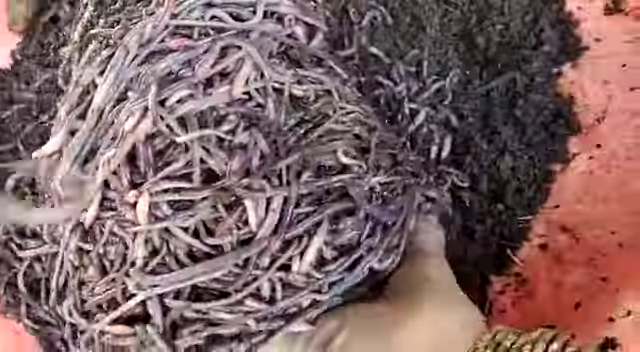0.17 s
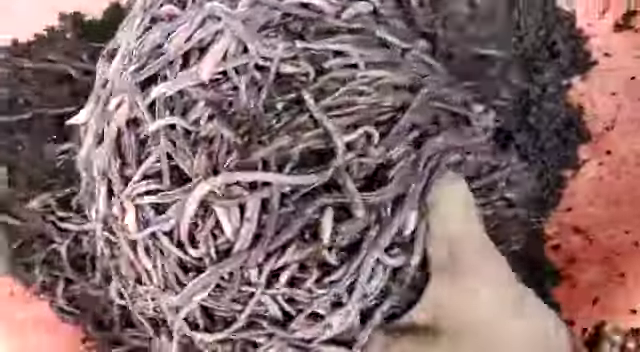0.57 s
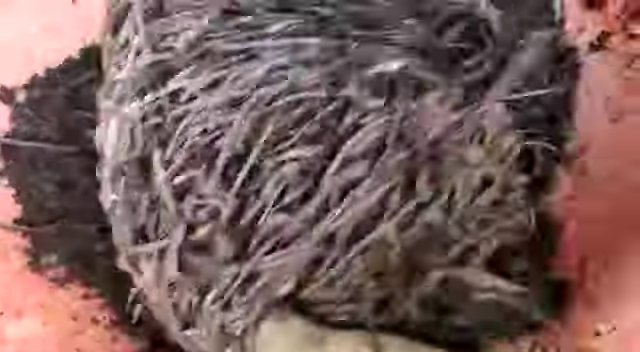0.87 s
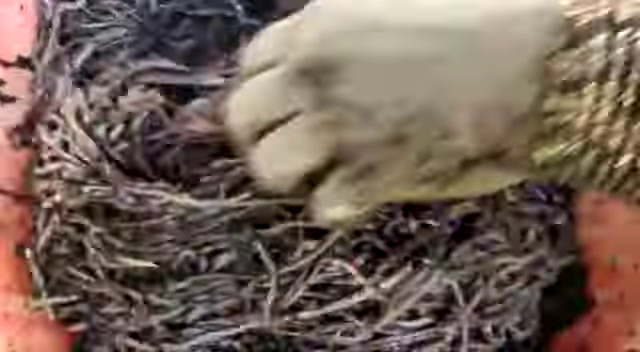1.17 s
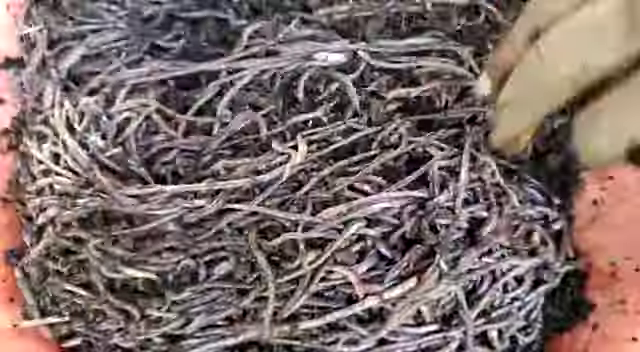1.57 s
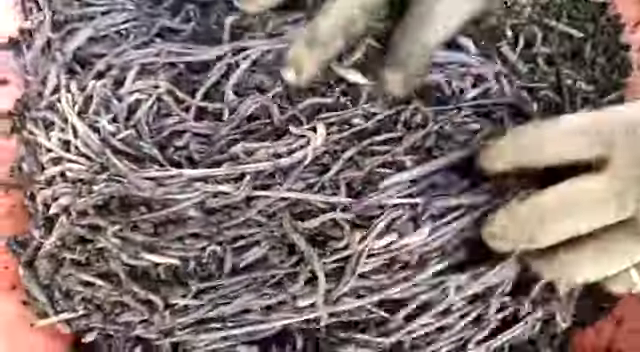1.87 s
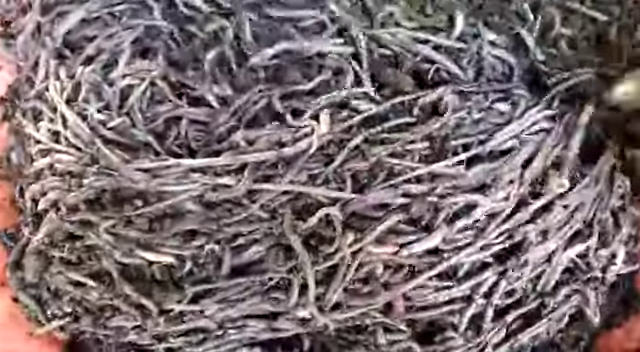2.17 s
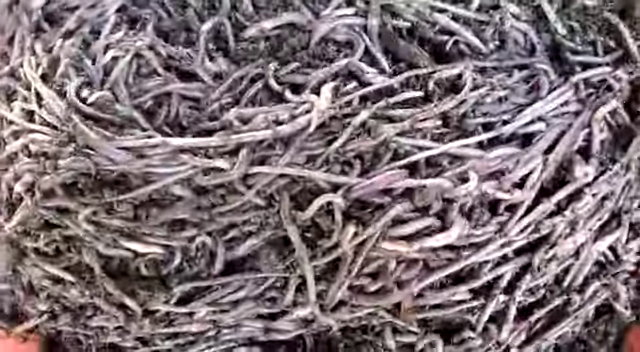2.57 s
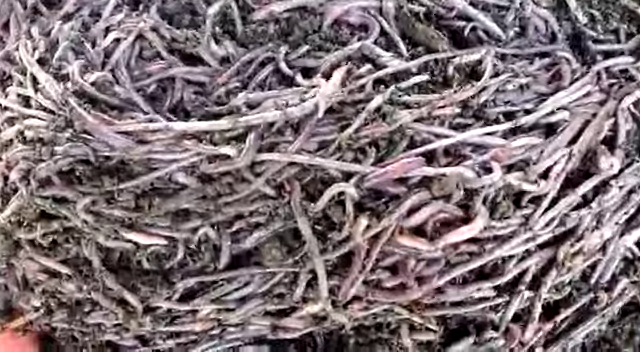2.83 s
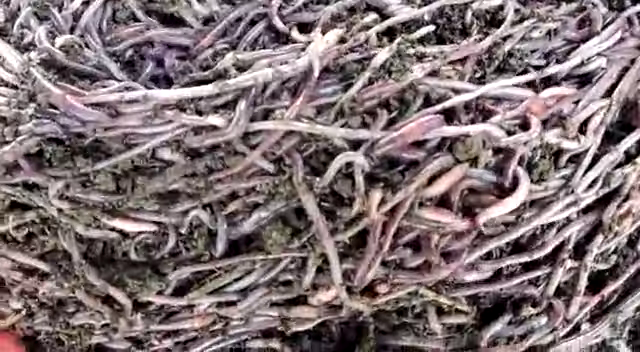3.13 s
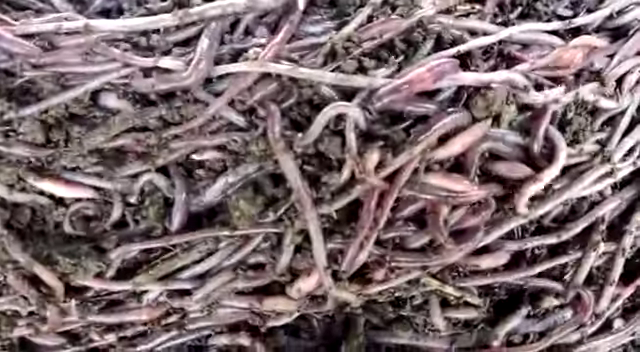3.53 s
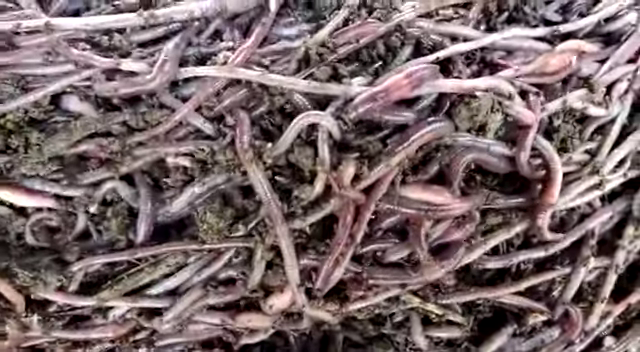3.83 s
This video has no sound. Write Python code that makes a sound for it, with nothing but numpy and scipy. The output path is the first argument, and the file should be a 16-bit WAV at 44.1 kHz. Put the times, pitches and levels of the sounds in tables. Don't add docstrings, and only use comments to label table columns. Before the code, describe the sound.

Close to the microphone, damp soil rumbles and knocks across a plastic basin for under a second, then stops; bangles clink, fingers briefly push the heap, and faint birds and crickets continue outdoors.

```python
import sys
import numpy as np
from scipy import signal
from scipy.fft import rfft, irfft, next_fast_len
from scipy.io import wavfile
from scipy.ndimage import uniform_filter1d, map_coordinates

SR = 44100
rng = np.random.default_rng(int(sys.argv[2]) if len(sys.argv) > 2 else 0)


def persist_wave(psi):
    counts = np.round(np.clip(psi, -1, 1) * 32767).astype(np.int16)
    wavfile.write(sys.argv[1], SR, np.atleast_2d(counts).T)


def rack_gain(trim_db):
    fader = np.asarray(trim_db, float)
    return 10 ** (fader / 20)


N = 176400

# t/s, level/dB
DRAG = [(0, -51.5), (.045, -46.5), (.115, -44), (.128, -45), (.2, -43), (.3, -49), (.43, -51), (.6, -46.5),
        (.66, -47.5), (.74, -47.5), (.815, -45.5), (.84, -58), (.86, -51), (.89, -47)]
# t/s, level/dB
PUSH = [
    (2.23, -52.5),
    (2.3, -76),
    (2.35, -68),
    (2.45, -75.5),
    (2.57, -78.5),
    (2.7, -75),
    (2.8, -64),
    (2.9, -66.5),
    (2.98, -79),
    (3.06, -85),
]
# f/Hz, level/dB
BASIN = [(40, -52), (246, -15.5), (631, -9.5), (1730, -19.5), (4000, -47.5)]
# f/Hz, level/dB
GRIT = [(700, -32.5), (1500, -8), (3170, -5), (4890, -10), (7400, -3.5), (15800, -21)]
# f/Hz, level/dB
CRUMBS = [(600, -36), (1500, 0), (6000, -21), (12000, -16), (15800, -20)]
# f/Hz, likeness [0..1]
BASIN_ALIKE = [(60, 0.84), (300, 1), (640, 0.92), (1400, 0)]
# t/s, peak level/dB, pitch f/Hz, T60/s
LUMPS = [(.039, -31.5, 540, 0.033), (.058, -29.5, 398, 0.033), (.078, -32.5, 644, 0.057),
         (.1, -34, 611, 0.061), (.144, -32.5, 700, 0.043), (0.156, -31, 515, 0.05), (.18, -26, 738, 0.035),
         (.212, -41, 772, 0.076), (0.366, -26.5, 483, 0.015), (.398, -37, 320, .03),
         (.445, -41, 484, 0.028), (.48, -33.5, 480, 0.023), (0.536, -34.5, 492, 0.036),
         (0.6, -34, 435, 0.033), (.727, -34, 393, 0.017), (.75, -25.5, 713, 0.021), (.802, -32, 616, .05),
         (0.813, -29.5, 606, 0.038), (0.854, -36.5, 657, 0.022), (0.878, -17, 665, 0.015),
         (.894, -16, 699, 0.011), (1.374, -62, 190, .08), (2.221, -28, 225, 0.02), (2.224, -35, 728, 0.019),
         (2.349, -47.5, 248, 0.037), (2.563, -57, 277, 0.074), (2.723, -69, 380, 0.072),
         (2.795, -49, 410, 0.025), (2.816, -40.5, 415, 0.021)]
# t/s, peak level/dB, low f/Hz, high f/Hz
TICKS = [
    (.1067, -37, 3970, 16330),
    (.2149, -36, 3000, 16340),
    (0.442, -33.5, 6460, 16700),
    (0.6958, -29.5, 1000, 15200),
    (1.53, -41.5, 1500, 16000),
    (2.059, -40.5, 890, 3175),
    (2.236, -25, 5460, 16000),
    (2.811, -38, 890, 4930),
    (2.967, -48, 7060, 15570),
]
# t/s, peak level/dB, low modes level/dB
CLINKS = [(0.039, -50, -17), (1.668, -37, -8), (3.016, -62.5, -19), (3.975, -66.5, -14.5),
          (0.8138, -45.5, -4), (0.8998, -34.5, 4.5), (0.9342, -43, -1), (1.115, -41.5, -9.5),
          (1.1353, -42.5, -7.5), (1.452, -40.5, -4), (1.4667, -46, -5.5), (1.658, -40, -9),
          (1.6869, -33.5, -7.5), (2.146, -49, -1.5), (2.1924, -37.5, -5), (2.215, -41, -3),
          (2.2471, -30.5, -6.5), (2.3106, -58, 7), (2.565, -57, -3), (2.7767, -55.5, -13),
          (3.491, -57, -29), (3.651, -38, -11.5), (3.688, -49.5, -13)]
# f/Hz, level/dB
GLASS = [(5900, 0), (6370, 0), (6850, -5), (7250, -8.5), (7800, -7), (10910, -1), (11060, -2),
         (11200, -1.5), (11470, -6.5), (11620, -4.5), (11800, -2), (12040, -2.5), (12550, -4.5),
         (13200, -10.5), (14150, -14)]
# t after the falling note/s, length/s, from f/Hz, to f/Hz, level/dB
SONG = [
    (-.04, 0.024, 3988, 3875, -8.5),
    (-.008, 0.016, 4340, 3560, -2),
    (0.01, 0.03, 3770, 3580, -4),
    (0.05, 0.048, 5256, 5383, -9),
    (0.098, .007, 6600, 5000, -14),
    (0.109, 0.028, 4737, 4576, -4),
]
# t/s, first half level/dB, second half level/dB, second half left-right level/dB
PHRASES = [
    (1.439, -54.5, -60, -25),
    (1.793, -55.5, -57.5, -11),
    (2.126, -58, -49, 10),
    (2.481, -53, -52, 12.5),
    (2.811, -58, -61.5, 11),
    (3.158, -58.5, -54, 14),
]
# t/s, length/s, from f/Hz, to f/Hz, level/dB
WHISTLES = [
    (1.477, 0.045, 5630, 5520, -64),
    (1.6, 0.057, 6700, 5070, -74),
]
# t/s, length/s, low f/Hz, high f/Hz, level/dB
RASPS = [(0.516, 0.18, 5750, 7490, -57), (0.972, 0.076, 5380, 5970, -63.5), (1.217, 0.17, 805, 1350, -72.5),
         (1.2, 0.49, 1295, 2279, -69.5), (1.257, 0.14, 2400, 5410, -60), (1.738, 0.22, 2448, 2620, -83),
         (1.858, 0.059, 5076, 5714, -62.5), (1.977, 0.18, 6330, 7270, -58),
         (1.996, 0.48, 1034, 2240, -67.5), (2.278, 0.14, 6140, 7290, -54), (2.339, 0.13, 7200, 8450, -58),
         (2.272, .13, 2500, 4100, -68), (2.495, 0.45, 2340, 2810, -74.5), (2.581, 0.094, 5050, 6100, -64),
         (3.096, 0.15, 2780, 5720, -59.5), (3.152, 0.17, 2440, 2690, -68), (3.289, 0.089, 5100, 5730, -69),
         (3.321, 0.15, 5970, 6500, -75.5), (3.55, 0.6, 1870, 2060, -75), (3.569, 0.3, 5930, 6070, -69),
         (3.786, 0.15, 2690, 5600, -59), (3.846, .2, 2460, 2795, -66.5)]
# from t/s, to t/s, level/dB
CRICKET = [
    (.08, .72, -63),
    (.9, 1.05, -63.5),
    (1.18, 1.7, -61),
    (1.88, 2.0, -71),
    (2.03, 2.4, -58.5),
    (2.42, 2.82, -72.5),
    (2.85, 3.24, -60.5),
    (3.26, 3.56, -74.5),
    (3.65, 4.05, -62),
]
# from t/s, to t/s, level/dB
KATYDID = [
    (1.25, 1.45, -80),
    (1.5, 2.02, -76),
    (2.35, 2.65, -79),
    (2.96, 3.62, -79.5),
]
# from t/s, to t/s, level/dB
FAR_KATYDID = [
    (.95, 1.4, -77),
    (2.05, 2.78, -75),
    (3.35, 4.05, -84.5),
]
# f/Hz, level/dB
AIR = [(30, -13.5), (170, -1), (450, -12.5), (1200, -14), (2400, -1.5), (3100, -10), (5500, -6.5),
       (9300, -8.5), (10200, -16), (15500, -27.5)]
# f/Hz, left-right level/dB
AIR_PAN = [(200, 3), (3000, 12)]

GRIT_DB, GRIT_STOPS_S, CRUMBS_DB, LUMP_CUT_HZ = -55, 0.78, -41, 130
GLASS_T60_S, HAND_LEAVES_S, HAND_PAN_DB = .045, 2.3, 9.5
RASP_RATE_HZ, RASP_PAN_DB, RASP_RISE_S, RASP_STREAK_DB = 130, 16.5, 0.018, 4
CRICKET_BLUR, AIR_DB = 1.1, -77
YARD_T60_S, GLASS_YARD_DB, CALLS_YARD_DB = 0.45, -18, -9.5
GATE_SHARE_PERCENT, GATE_DEPTH_DB, TOP_HZ = 18, 22, 15750


def unit(x):
    return x / np.sqrt(np.mean(x ** 2) + 1e-20)


def along(points, hz):
    f, v = np.transpose(points)
    return np.interp(np.log(hz + 1), np.log(f + 1), v)


def gain(rows, fade):
    s, db = np.transpose(rows)
    t = np.arange(N) / SR
    gate = np.clip(np.minimum(t - s[0], s[-1] - t) / fade + 1, 0, 1)
    return gate * rack_gain(np.interp(t, s, db))


def bouts(rows, fade=0.078):
    t = np.arange(N) / SR
    return sum(rack_gain(db) * np.clip(np.minimum(t - a, b - t) / fade + .5, 0, 1) for a, b, db in rows)


def wobble(rate):
    knots = rng.standard_normal(int(N * rate / SR) + 4)
    return map_coordinates(knots, [np.arange(N) * rate / SR])


def filtered(x, response):
    m = next_fast_len(x.shape[-1] + 8192)
    return irfft(rfft(x, m) * response(np.fft.rfftfreq(m, 1 / SR)), m)[..., :x.shape[-1]]


def band(x, low_hz, high_hz, low_order, high_order):
    return filtered(x, lambda f: 1 / (1 + (low_hz / (f + 1)) ** low_order + (f / high_hz) ** high_order))


def sides(db):
    return np.sqrt(2 / (1 + rack_gain(np.array([-2 * db, 2 * db]))))


def add(out, s, x, pan_db):
    part = out[:, round(s * SR):][:, :x.shape[-1]]
    part += (sides(pan_db)[:, None] * x)[:, :part.shape[1]]


def rush(source, spectrum, alike):
    def mid_side(hz):
        turn = np.arccos(np.clip(along(alike, hz), -1, 1)) / 2
        return rack_gain(along(spectrum, hz)) * [np.cos(turn), np.sin(turn)]
    mid, side = filtered(source, mid_side)
    return unit(np.array([mid + side, mid - side]))


def gravel(rate, spread_db, smooth):
    hit = rng.random(N) < rate / SR
    size = hit * rack_gain(spread_db * np.minimum(rng.exponential(size=N), 3))
    return unit(size * rng.standard_normal((2, N))) + smooth * rng.standard_normal((2, N))


def patches(x, depth_db, bins, frames):
    z = signal.stft(x, nperseg=512)[2]
    field = rng.standard_normal(z.shape)
    for _ in range(2):
        field = uniform_filter1d(field, int(bins), 1)
        field = uniform_filter1d(field, int(frames), 2)
    return signal.istft(z * rack_gain(depth_db * unit(field)), nperseg=512)[1][:, :x.shape[-1]]


def dragged_soil():
    grains = rush(gravel(500, spread_db=2, smooth=1.16), BASIN, BASIN_ALIKE)
    rumble = patches(grains, depth_db=2.5, bins=2, frames=3.3)
    out = gain(DRAG, fade=0.02) * rack_gain(0.83 * wobble(70)) * rumble
    grit = rush(gravel(820, spread_db=8.5, smooth=4.2), GRIT, [(3000, 0.071)])
    hiss = patches(grit, depth_db=3.0, bins=8.8, frames=4.8)
    after_s = np.maximum(np.arange(N) / SR - GRIT_STOPS_S, 0)
    hiss_gain = rack_gain(GRIT_DB - 83 * after_s ** 1.36)
    return out + hiss_gain * rack_gain(0.56 * wobble(22.0)) * sides(2.5)[:, None] * hiss


def pushed_heap():
    push = gain(PUSH, fade=0.018)
    dull = BASIN * np.array([.48, 1.15])
    grains = rush(gravel(200, spread_db=-3.0, smooth=1.86), dull, BASIN_ALIKE)
    rub = push * rack_gain(3.86 * wobble(28.39)) * patches(grains, depth_db=7.0, bins=1.8, frames=3.6)
    falling = rush(gravel(260, spread_db=4, smooth=1.2), CRUMBS, [(3000, .4)])
    crumbs = patches(falling, depth_db=6, bins=12, frames=3.5)
    return rub + push ** 0.54 * rack_gain(CRUMBS_DB) * sides(6.9)[:, None] * crumbs


def lumps_and_ticks():
    out, t = np.zeros((2, N)), np.arange(SR // 10) / SR
    for s, db, hz, t60 in LUMPS:
        r = rng.normal(size=4)
        modes = [(1, 1), (.55 + 0.032 * r[0], .25), (1.4 + .1 * r[1], .4)]
        ring = sum(g * np.sin(2 * np.pi * hz * k * t) for k, g in modes)
        soft_start = (1 - np.exp(-t * hz / .4)) ** 2
        knock = rack_gain(db + 4 - 60 * t / t60) * soft_start * ring
        add(out, s, filtered(knock, lambda f: (1j * f / (LUMP_CUT_HZ + 1j * f)) ** 2), -1.5)
    for s, db, low_hz, high_hz in TICKS:
        tick = rack_gain(-60 * t / 0.0112) * rng.standard_normal((2, len(t)))
        add(out, s, rack_gain(db) * band(tick, low_hz, high_hz, 4, 6), 3)
    return out


def bangles():
    out, t = np.zeros((2, N)), np.arange(SR // 6) / SR
    hz, level = np.transpose(GLASS)[:, :, None]
    low = hz < 9500
    for s, db, low_db in CLINKS:
        pan_db = HAND_PAN_DB * (s > HAND_LEAVES_S)
        for touch in range(3):
            r = rng.normal(size=(4, len(GLASS), 1))
            t60 = GLASS_T60_S * rack_gain(r[1])
            env = rack_gain(level + low_db * low + 2.5 * r[0] - 60 * t / t60)
            mode_hz = hz * (1 + (0.0056 + 0.023 * low) * r[2])
            phase = 2 * np.pi * mode_hz * t
            ring = np.array([np.sum(env * np.sin(phase + mic * 2 * r[3]), 0) for mic in (0, 1)])
            crack = 0.36 * rack_gain(-60 * t / 0.0094) * np.diff(rng.standard_normal((2, len(t) + 1)))
            clink = ring * (1 - np.exp(-t / 0.00073)) + crack
            touch_db = db - 7.5 - 1.8 * abs(touch - .8)
            add(out, s + 0.0035 * touch, rack_gain(touch_db) * clink, pan_db)
    return out


def note(length, from_hz, to_hz, db):
    full_s = length * 1.3
    u = np.arange(int(full_s * SR)) / (full_s * SR)
    env = rack_gain(db + 3.5 + 4.6 * wobble(220)[:len(u)]) * np.sin(np.pi * u) ** 0.89
    return env * np.sin(2 * np.pi * np.cumsum(from_hz + (to_hz - from_hz) * u) / SR)


def whistling_birds():
    out = np.zeros((2, N))
    for s, first_db, second_db, second_pan_db in PHRASES:
        for after, length, from_hz, to_hz, db in SONG:
            tune, late = 1 + 0.019 * rng.normal(), after > .05
            half_db, pan_db = (second_db, second_pan_db) if late else (first_db, 14)
            add(out, s + after, note(length, from_hz * tune, to_hz * tune, db + half_db), pan_db)
    for s, *row in WHISTLES:
        add(out, s, note(*row), 14)
    return out


def rasps_and_bursts():
    out = np.zeros((2, N))
    for s, length, low_hz, high_hz, db in RASPS:
        t = np.arange(int((length + .15) * SR)) / SR
        beat = rack_gain(1.9 * wobble(RASP_RATE_HZ)[:len(t)] + 0.73 * wobble(15)[:len(t)])
        streaky = patches(beat * rng.standard_normal((2, len(t))), RASP_STREAK_DB, bins=2, frames=7)
        buzz = unit(band(streaky, low_hz, high_hz, 60, 60))
        fall = rack_gain(-60 * np.maximum(t - 0.85 * length, 0) / (0.05 + 0.23 * length))
        env = np.clip(t / RASP_RISE_S, 0, 1) * fall
        add(out, s, rack_gain(db) * env * buzz, RASP_PAN_DB * min(1, low_hz / 2500))
    return out


def trill(hz, width_hz, rate, scatter, blur, table, pan_db):
    phase = np.cumsum(rate * (1 + scatter * wobble(11))) / SR
    strokes = (np.diff(np.floor(phase), prepend=0) > 0) * rack_gain(1.3 * wobble(40))
    carrier = unit(strokes) + blur * rng.standard_normal((2, N))
    tone = filtered(carrier, lambda f: np.exp(-.5 * ((f - hz) / width_hz) ** 2))
    return sides(pan_db)[:, None] * bouts(table) * rack_gain(wobble(9.6)) * unit(tone)


def insects():
    out = trill(4320, 115, 47, scatter=0.064, blur=CRICKET_BLUR, table=CRICKET, pan_db=20)
    out += trill(9268, 100, 130, scatter=0.09, blur=1.3, table=KATYDID, pan_db=20.5)
    return out + trill(8780, 80, 140, scatter=0.03, blur=3.3, table=FAR_KATYDID, pan_db=1.5)


def yard(x):
    t = np.arange(SR // 2) / SR
    tail = rng.standard_normal((2, len(t))) * rack_gain(-60 * t / YARD_T60_S) * np.clip(t / 0.049, 0, 1)
    return signal.fftconvolve(x, tail / np.linalg.norm(tail[0]), axes=1)[:, :N]


def air():
    bed = rush(rng.standard_normal((2, N)), AIR, [(60, .75), (300, 0.34), (800, 0.025)])
    bed = filtered(bed, lambda hz: sides(along(AIR_PAN, hz)))
    return rack_gain(AIR_DB) * patches(bed, depth_db=5.0, bins=2, frames=33)


def scene():
    glass = bangles()
    calls = whistling_birds() + rasps_and_bursts()
    near = dragged_soil() + pushed_heap() + lumps_and_ticks() + glass
    sent = rack_gain(GLASS_YARD_DB) * (1 + wobble(400)) * glass + rack_gain(CALLS_YARD_DB) * wobble(300) * calls
    return near + calls + insects() + yard(sent) + air()


def suppress(x):
    hz, _, z = signal.stft(x, SR, nperseg=1024)
    power = uniform_filter1d(np.abs(z) ** 2, size=9, axis=1)
    power = uniform_filter1d(power, size=5, axis=2)
    quiet = power < np.percentile(power, GATE_SHARE_PERCENT, axis=2, keepdims=True)
    shut = uniform_filter1d(quiet * (hz > 2400)[:, None] * 1., size=3, axis=1)
    z = z * rack_gain(-GATE_DEPTH_DB * shut) * (hz < TOP_HZ)[:, None]
    return signal.istft(z, SR, nperseg=1024)[1][:, :N]


def low_pass(x):
    return signal.sosfilt(signal.butter(12, 16520, fs=SR, output="sos"), x)


def record(dry):
    mix = suppress(dry)
    return low_pass(mix)


dry = scene()
out = record(dry)
persist_wave(out)
```